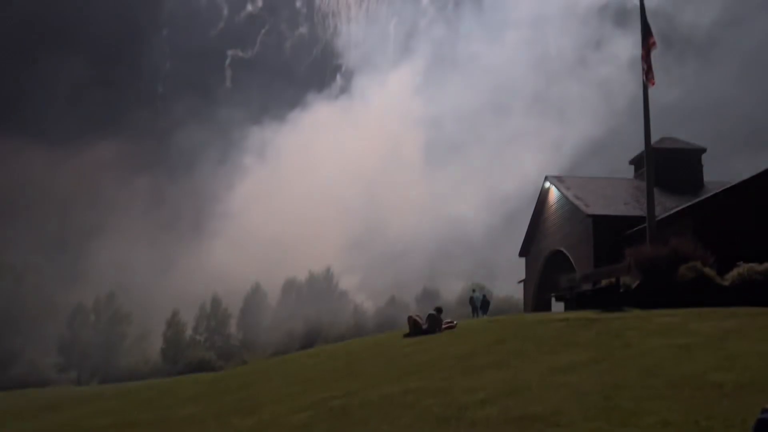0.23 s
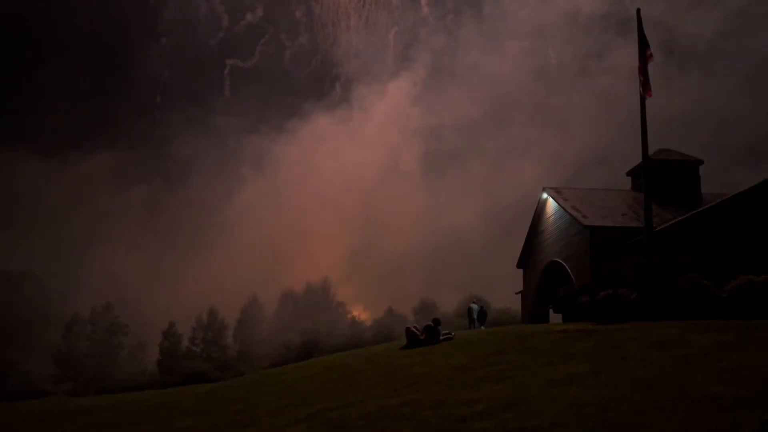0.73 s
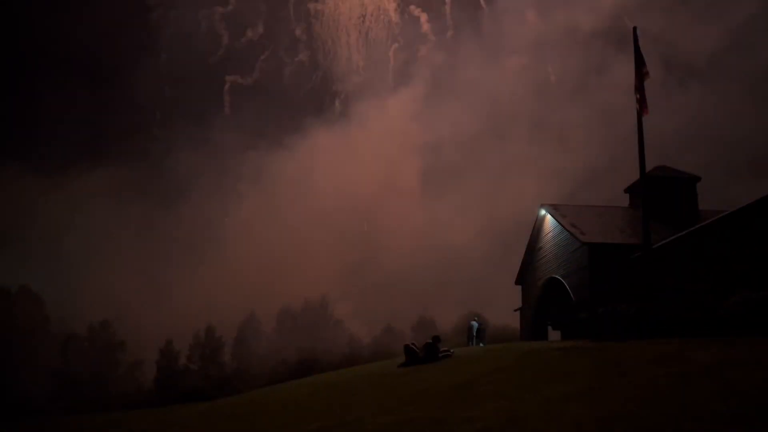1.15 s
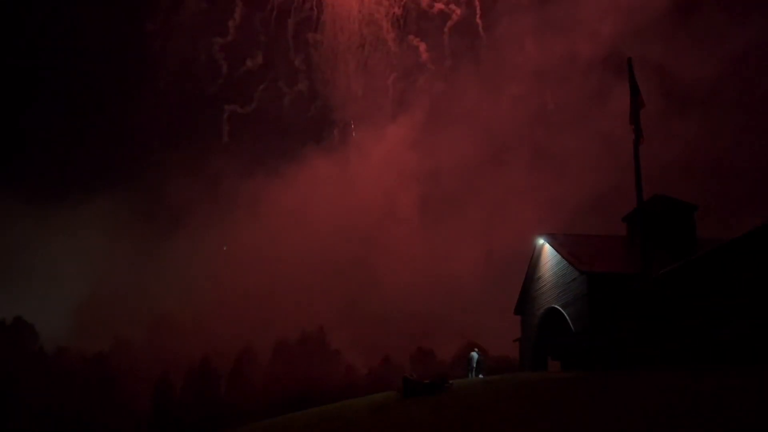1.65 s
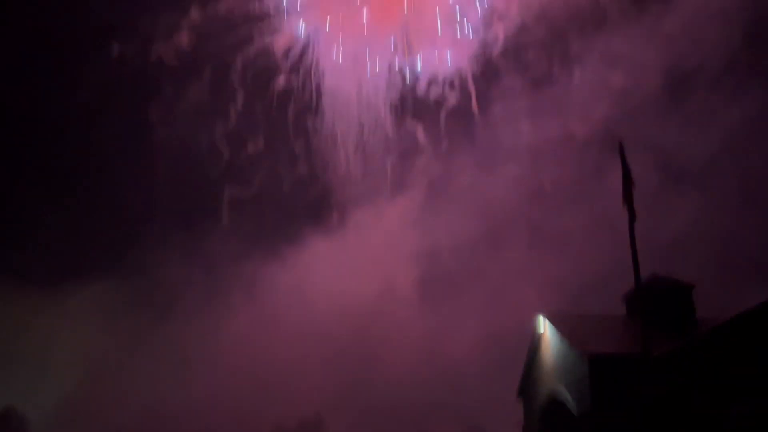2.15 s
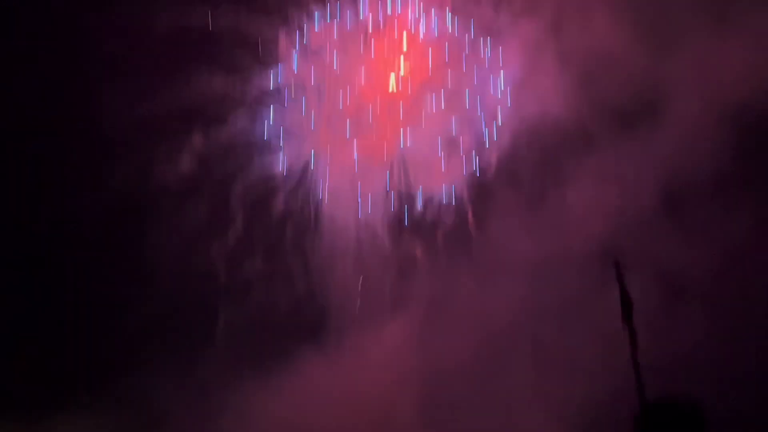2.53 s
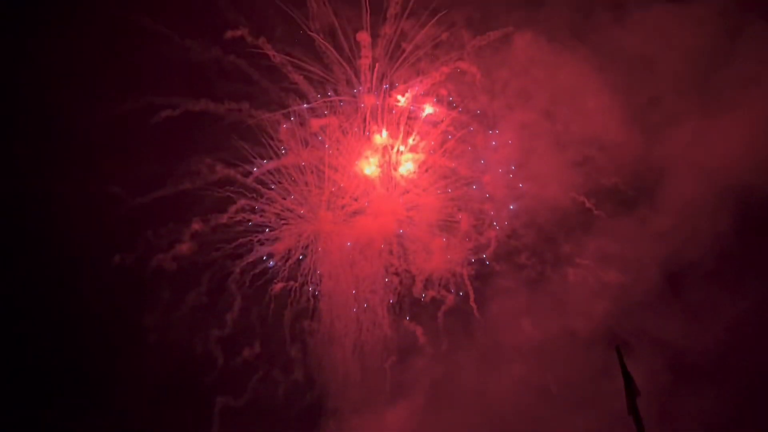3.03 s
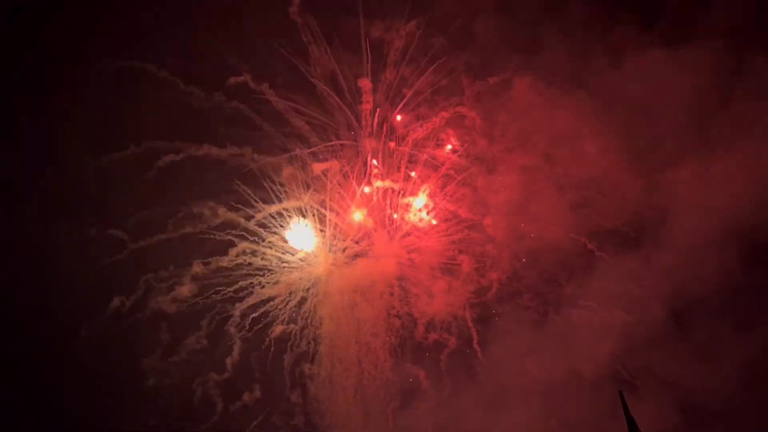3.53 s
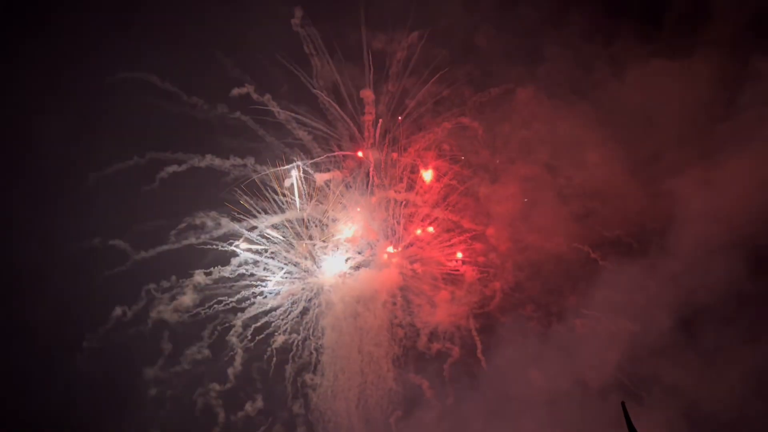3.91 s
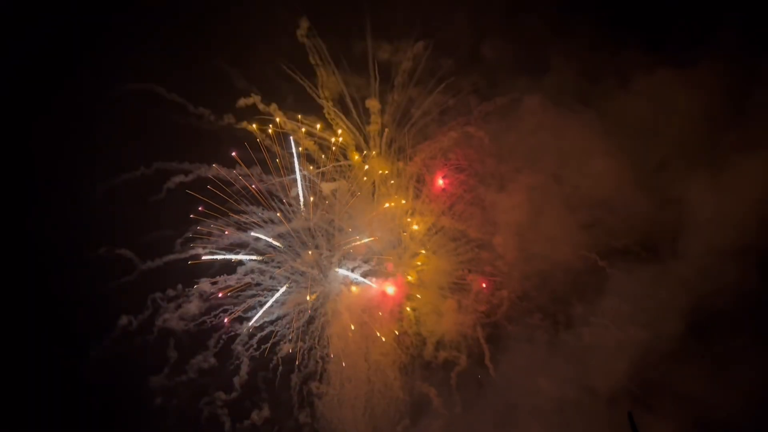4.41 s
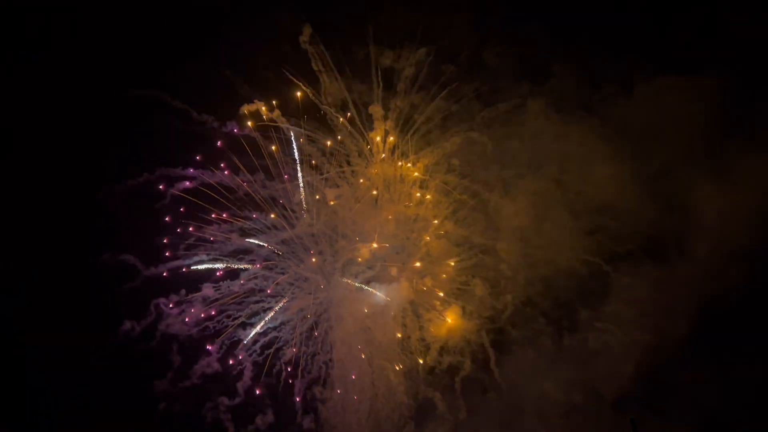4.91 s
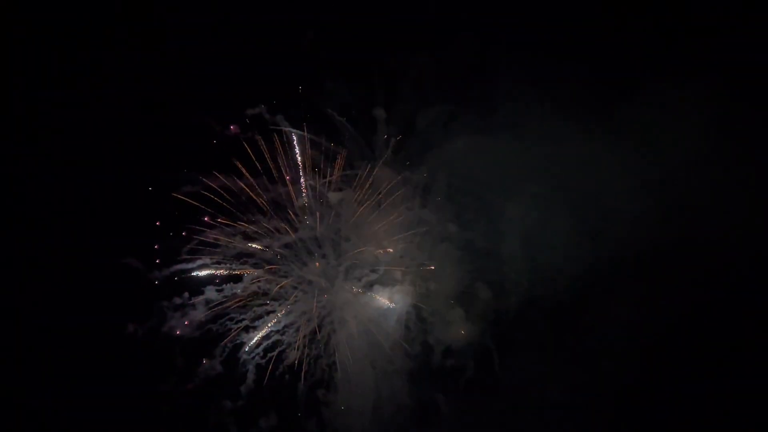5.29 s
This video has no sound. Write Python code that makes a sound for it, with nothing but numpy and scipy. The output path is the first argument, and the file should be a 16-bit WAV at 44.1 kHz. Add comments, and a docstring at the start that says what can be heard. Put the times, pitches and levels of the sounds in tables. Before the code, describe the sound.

Firework shells burst over a night hillside: a tight opening volley, then spaced cracks and deep booms, each trailing rumbling, hissing echoes.

```python
"""A hillside at night: firework shells burst high above it, received by a small two-port microphone.
Each bang or thud is a minimum-phase pulse, a crack over a boom, doubled by its reflection off the ground.
Woods and slopes return noise shaped in time and frequency: a rumble and a hiss that dulls with age.
Hillside and buildings clatter with runs of filtered clicks; swarms of stars crackle in the same way.
A faint background of hiss and rumble lies beneath."""
import sys
import numpy as np
from scipy import signal
from scipy.fft import rfft, irfft, next_fast_len
from scipy.io import wavfile
from scipy.ndimage import uniform_filter1d, map_coordinates

SR = 44100
rng = np.random.default_rng(int(sys.argv[2]) if len(sys.argv) > 2 else 0)


def dump(signal):
    """Clip the signal to [-1, 1] and save it as 16-bit WAV at the path in sys.argv[1]."""
    limited = np.clip(np.atleast_2d(signal).T, -1, 1)
    pcm = np.round(limited * 32767).astype(np.int16)
    wavfile.write(sys.argv[1], SR, pcm)


N = 244858

# Blasts, thuds and single echoes: start_s, ground_delay_s, scatter_db, hollow_hz (0 or less: none),
# boom_db, boom_low_hz, boom_high_hz, crack_db, crack_corner_hz, air_cutoff_hz
BANGS_AND_THUDS = [ (0.039, 0.00134, -7, 0, 24, 85, 140, -1, 900, 2500),
                   (0.07, 0.00133, -10, 0, 16, 80, 130, -3, 900, 2500),
                   (0.098, 0.0014, -12, 0, 25, 70, 125, -5, 800, 3000),
                   (0.163, 0.0016, 0, 0, 24.5, 85, 159, -4, 700, 3000),
                   (0.204, 0.0012, -7, 0, 14, 120, 250, 2, 900, 1800),
                   (1.224, 0.002, 4.5, 0, 10, 54, 140, -17, 303, 2000),
                   (1.279, 0.0015, 3, 2609, 33.5, 49.6, 120.5, 15.5, 236, 4030),
                   (1.517, 0.002, -2, 0, 16, 66, 163, -6, 302, 2010),
                   (1.6613, 0.00389, -4.5, 2, 34.5, 120, 343, 33.5, 356, 13070),
                   (2.777, 0.0013, -1.5, 0, 6, 100, 250, -14, 795, 3490),
                   (3.1407, 0.00304, 2, 0, 4.5, 189, 335, -27.5, 600, 2550),
                   (3.2456, 0.0041, 1, 2798, -2, 130, 374, 7, 800, 2020),
                   (3.3007, 0.00471, -1, 2830, -2, 190, 370, 15.5, 1390, 4230),
                   (3.461, 0.0027, 0, 0, 10.5, 160, 305, -18, 600, 2500),
                   (3.8145, 0.00453, -1.5, 3251, -2, 160, 458, 19.5, 975, 5880),
                   (4.16, 0.00435, -1.5, -3, 34, 53.6, 247, 31, 395, 12500),
                   (4.221, 0.0016, 3, -5, 22.5, 61, 195, -7, 400, 2000),
                   (4.426, 0.0016, 1.5, 0, 23, 101, 211, 1.5, 500, 2000),
                   (4.496, 0.0019, -7, 0, 22, 100, 203, -6, 500, 2000),
                   (4.85, 0.0017, -3.5, 0, 8, 90.4, 247, -7, 780, 2960),
                   (4.876, 0.0017, 9, 0, 18.5, 75, 148, -10, 500, 2010),
                   (5.0278, 0.0012, -3, 0, -2, 60, 150, 6.5, 3430, 3600),
                   (5.0312, 0.00124, -2, 0, 41.5, 51.3, 149, 16.5, 2360, 3450),
                   (5.422, 0.0011, 6, 0, 26.5, 49.7, 116, -5, 306, 2030)]
# Microphone colour for sound from overhead: frequency_hz, level_db
OVERHEAD_RESPONSE = [(100, 2), (300, 2.2), (480, 2.5), (700, 0), (1000, -1.5), (1250, -2.5), (1430, 2),
                     (1640, -5.5), (1850, -2.5), (2400, -3.5), (3300, -5.5), (4400, -2), (5600, -6.5),
                     (7200, -1), (13500, -1.5), (16000, -5)]
# All-pass turns of the microphone, by which the bass of a blast lags its treble: frequency_hz
ALL_PASS_HZ = [80, 200, 540, 1900]
# Swarms of crackling stars: loudest_s, length_s, level_db, snaps_per_s, low_hz, high_hz,
# ground_delay_s, left_lead_s
STAR_SWARMS = [ (0.034, 0.12, -35.5, 430, 780, 4200, .0015, -.00013),
               (0.174, 0.067, -37.5, 450, 990, 3800, .0015, -.00013),
               (4.566, 0.24, -43.5, 1100, 880, 3500, 0.000745, 0)]
# Clattering echoes from hillside (left) and buildings (right): start_s, attack_s, fade_db_per_s,
# level_db, low_hz, high_hz, left_lead_s
CLATTER_ECHOES = [ (0.238, .007, 500, -44, 400, 1100, -.0003),
                  (0.66, 0.038, 39.5, -51.5, 550, 2400, .00041),
                  (1.373, 0.0069, 350, -42, 380, 1410, -.00025),
                  (1.722, 0.018, 130, -40, 350, 2500, -.00025), (2.19, 0.068, 40, -49.5, 497, 2420, .00038),
                  (2.32, 0.015, 172, -42, 420, 1090, .0004), (2.765, 0.019, 17, -55, 590, 1460, .00042),
                  (4.248, .006, 500, -35, 300, 1000, -0.0095), (4.279, .006, 500, -39.5, 320, 1200, -.0003),
                  (4.65, 0.083, 50, -42.5, 780, 2890, .00041),
                  (5.124, 0.0092, 333, -28.5, 400, 1380, 0.0011)]
# Rolls of echo set off by the big blasts: start_s, attack_s, hold_s, fade_db_per_s, hiss_db, rumble_db,
# treble_loss_db (at 5 kHz), far_slope_db, hollow_hz (0 or less: none)
ECHO_ROLLS = [ (-0.02, 0.0066, 0.13, 66, -34, -27, 3, -19, 0),
              (0.209, 0.0075, 0.02, 30, -45.5, -43, -2, -15, 0),
              (1.316, 0.066, 0.2, 33, -43.5, -47, 3, -4, 0),
              (1.672, 0.052, 0.0067, 50, -43, -33.5, -2, -7, 0),
              (3.278, 0.031, 0.081, 36.5, -47, -57.5, 2.5, -12, 2829),
              (3.805, 0.074, 0.051, 31, -45, -62, 1.5, 7.5, 3243),
              (4.14, 0.11, 0.49, 19, -41, -30.5, -3, -4.5, 4),
              (5.074, 0.047, 0.15, 34, -33.5, -32, 2.5, -16, 0)]
# Colours of rumble and hiss: frequency_hz, level_db
RUMBLE_COLOUR = [(25, -3), (45, 18), (65, 19.5), (120, 22), (180, 18), (260, 10), (400, -3), (700, -13),
                 (2000, -58)]
HISS_COLOUR = [(60, -11.5), (200, 12), (400, 10.5), (700, 9.5), (1100, 8.5), (1400, 11), (1560, 9),
               (1750, 6), (2000, 4), (2250, 3), (2550, 5), (3200, 3), (4700, 1.16), (5600, -3), (7500, -6),
               (10000, -15), (13000, -17), (16000, -33.5)]
# Faint background hiss between the blasts: time_s, hiss_db
BACKGROUND_HISS = [(0, -55), (1.15, -57), (2.6, -52.5), (3.2, -52), (5.55, -47.5)]
# Correlation of diffuse sound between the ports: frequency_hz, likeness (-1 to 1)
PORT_LIKENESS = [(50, 1), (130, 0.95), (250, 0.89), (550, 0.3), (900, 0.19), (1400, -0.53), (2100, 0.64),
                 (4000, 0.33), (7000, 0.43), (10000, 1)]
# Phase by which the left port leads: frequency_hz, lead_rad
PORT_LEAD = [(60, 0), (250, .1), (600, .5), (1400, .1), (3500, .55), (5000, .25), (7000, -.4), (8500, -1.5),
             (10000, -3.1), (13000, -6.3), (16000, -8.5)]
# Brief dip of the level: from_s, to_s, level_db
LEVEL_DIP = (0.2128, 0.223, -14)

BLAST_SIZE, FRAME = 16384, 1024  # samples
BLAST_PAN_DB = 3.5  # all bangs and thuds lie a little to the left
WALL_DELAY_S = 0.068  # slap from a building close by
SWARM_WIDTH, CLATTER_WIDTH = 0.55, 0.52  # independent share of each click at the two ports
SNAP_SPREAD_DB, REFLECTIONS_PER_S = 4, 1500
BUILD_POWER = 2.4  # ever more trees reflect as the wave front spreads
DULLING_DB_PER_S = 13.5  # at 5 kHz: later echoes have crossed more air
# Each roll comes back from the far slope
SLOPE_DELAY_S, SLOPE_ATTACK_S, SLOPE_HOLD_S = 0.44, 0.15, 0.12
SLOPE_FADE_DB_PER_S, SLOPE_LOSS_DB, SLOPE_RUMBLE_DB = 19.5, 1, -0.5
BACKGROUND_RUMBLE_DB, BACKGROUND_LOSS_DB = -45.5, 16  # the loss is at 5 kHz
CUTOFF_HZ = 16300


def blasts(shade_low_hz=520, shade_top_hz=6000):
    """Superposition: every bang or thud reaches both ports, only mid frequencies being shaded to one side."""
    out, hz = np.zeros((2, N + BLAST_SIZE)), bins(BLAST_SIZE)
    shade = 1 / (1 + (shade_low_hz / hz) ** 2) / (1 + (hz / shade_top_hz) ** 2)
    sides = from_db(np.array([[0.5], [-0.5]]) * BLAST_PAN_DB * shade)
    fade = np.minimum(1, np.linspace(2, 0, BLAST_SIZE)) ** 2
    for start_s, bounce_s, scatter_db, hollow_hz, *colour in BANGS_AND_THUDS:
        source = blast_wave(*colour) * hollow(hz, hollow_hz)
        arriving = source * surroundings(bounce_s, scatter_db) * sides
        start = round(start_s * SR)
        out[:, start:start + BLAST_SIZE] += irfft(arriving) * fade
    return out[:, :N]


def blast_wave(boom_db, low_hz, high_hz, crack_db, corner_hz, air_hz, crack_low_share=1.0, port_low_hz=45):
    """Explosive radiation: a swelling gas ball booms, its shock front cracks, the air takes off the top."""
    hz = bins(BLAST_SIZE)
    boom = from_db(boom_db) / np.hypot(1, (low_hz / hz) ** 2) / np.hypot(1, (hz / high_hz) ** 4)
    crack = from_db(crack_db) / np.hypot(1, hz / corner_hz) / np.hypot(1, crack_low_share * low_hz / hz)
    air = 1 / np.hypot(1, (hz / air_hz) ** 2)
    microphone = from_db(at_hz(OVERHEAD_RESPONSE, hz)) / np.hypot(1, (port_low_hz / hz) ** 3)
    wave = causal(np.hypot(boom, crack) * air * microphone)
    return -wave * smear(hz)


def causal(gain):
    """Minimum phase: folding the cepstrum gives a gain curve a pulse with a sudden front."""
    cepstrum = irfft(np.log(gain + 1e-7))
    half = len(cepstrum) // 2
    folded = np.r_[cepstrum[0], 2 * cepstrum[1:half], np.zeros(half)]
    return np.exp(rfft(folded))


def smear(hz, damping=0.68):
    """Phase dispersion: a chain of all-passes turns a pulse into a quick downward sweep."""
    turns = [1 - (hz / turn) ** 2 + 1j * damping * hz / turn for turn in ALL_PASS_HZ]
    return np.prod([np.conj(turn) / turn for turn in turns], axis=0)


def hollow(hz, dip_hz, depth_db=6.5, second_dip=1.79, width=0.057):
    """Spectral notching: some shells crack with two dips in the treble, which their echoes keep."""
    if dip_hz <= 0:
        return np.ones_like(hz)
    centres = (dip_hz, second_dip * dip_hz)
    dips = sum(np.exp(-(np.log(hz / centre) / width) ** 2 / 2) for centre in centres)
    return from_db(-depth_db * dips)


def surroundings(bounce_s, scatter_db, bounce=0.48, grass_hz=4200, grazing_db=5, steep_s=0.0014):
    """Multipath: direct sound, one bounce off the grass, scatter nearby and a dull slap from a wall."""
    hz = bins(BLAST_SIZE)
    ground = bounce * np.exp(-2j * np.pi * hz * bounce_s) / (1 + 1j * hz / grass_hz)
    close = scatter(level_db=4.5, t60=0.041, low_hz=1233, top_hz=3450)
    lowness = 1 - bounce_s / steep_s  # a low source bounces sooner and grazes more of the hillside
    further = scatter(level_db=-1.0, t60=0.15, low_hz=254, top_hz=2196) * from_db(grazing_db * lowness)
    slap = scatter(level_db=-12.0, t60=0.32, low_hz=90, top_hz=160)
    wall = slap * np.exp(-2j * np.pi * hz * WALL_DELAY_S)
    return 1 + ground + from_db(scatter_db) * (close + further + wall)


def scatter(level_db, t60, low_hz, top_hz):
    """Diffuse reflection: a spray of small reflections decays exponentially, by 60 dB in t60 seconds."""
    hz, t = bins(BLAST_SIZE), np.arange(BLAST_SIZE) / SR
    spray = rng.standard_normal((2, BLAST_SIZE)) * from_db(-60 * t / t60)
    mid, side = rfft(spray / np.sqrt(np.sum(spray ** 2) / 2))
    band = 1 / (1 + low_hz / (1j * hz)) / (1 + 1j * hz / top_hz)
    return from_db(level_db) * two_ports(mid, side, hz) * band


def crackle(bounce=0.87):
    """Random impulse trains: swarms of snapping stars swell and fade, doubled by ground reflection."""
    out, t = 0, np.arange(N) / SR
    for loudest_s, length_s, db, snaps_per_s, low_hz, high_hz, bounce_s, lead_s in STAR_SWARMS:
        direct = snaps(snaps_per_s, SWARM_WIDTH, low_hz, high_hz, lead_s)
        reflected = np.array([delayed(port, bounce_s) for port in direct])
        swarm = direct + bounce * reflected
        swell = np.exp(-2 * ((t - loudest_s) / length_s) ** 2)
        out = out + swarm / swarm.std() * from_db(db) * swell
    return out


def clatter(rough_db=2.5, air_hz=5500):
    """Discrete echoes: a hillside or building returns a blast as a rough run of reflections from one side."""
    out, t = 0, np.arange(N) / SR
    for start_s, attack_s, fade, db, low_hz, high_hz, lead_s in CLATTER_ECHOES:
        level = from_db(db) * np.sqrt(envelope(t - start_s, attack_s, 0, fade))
        out = out + level * snaps(REFLECTIONS_PER_S, CLATTER_WIDTH, low_hz, high_hz, lead_s, order=2)
    out = signal.sosfilt(signal.butter(3, air_hz, fs=SR, output="sos"), out + 1e-18)
    return out * from_db(rough_db * flutter(per_s=40))


def snaps(per_s, width, low_hz, high_hz, lead_s, order=3):
    """Time difference of arrival: uneven band-passed clicks reach one port first; rms 1 at the left port."""
    born = rng.random(N) < per_s / SR
    sizes = from_db(SNAP_SPREAD_DB * np.minimum(rng.standard_normal(N), 2))
    shared = rng.choice([-1, 1], N)
    clicks = born * sizes * (shared + width * rng.standard_normal((2, N)))
    band = signal.butter(order, [low_hz, high_hz], "band", fs=SR, output="sos")
    left, right = signal.sosfilt(band, clicks + 1e-18)
    return np.array([left, delayed(right, lead_s)]) / left.std()


def echoes(grain_db=0.5, patchy_db=2.0, swell_db=1.88, lumpy_db=3.0, low_hz=44):
    """Reverberation: countless small reflections merge into lumpy rumble and grainy hiss, over a background."""
    noise = rng.standard_normal((2, N))
    hz, t, (mid, side) = signal.stft(noise, SR, nperseg=FRAME, noverlap=FRAME * 3 // 4)
    hz = np.maximum(hz, 1)
    hiss, rumble = rolls(hz, t)
    uneven_db = patchy_db * patches(hz, t, width_hz=110, lasts_s=0.13, glide_hz_per_s=700)
    uneven_db += swell_db * patches(hz, t, width_hz=662, lasts_s=0.05)
    lumps_db = lumpy_db * patches(hz, t, width_hz=420, lasts_s=0.06)
    hiss = hiss * from_db(at_hz(HISS_COLOUR, hz)[:, None] + uneven_db)
    rumble = rumble * from_db(at_hz(RUMBLE_COLOUR, hz)[:, None] + lumps_db)
    shaped = two_ports(mid, side, hz[:, None]) * np.hypot(hiss, rumble)
    _, sound = signal.istft(shaped, SR, nperseg=FRAME, noverlap=FRAME * 3 // 4)
    sound = sound[:, :N] * from_db(grain_db * flutter(per_s=380))
    return signal.sosfilt(signal.butter(4, low_hz, "high", fs=SR, output="sos"), sound)


def rolls(hz, t, air_power=0.9):
    """Air absorption: each roll returns from the woods, then from the far slope, and dulls as it ages."""
    # Relative absorption: 0 at 1 kHz, 1 at 5 kHz
    absorption = ((hz[:, None] / 1000) ** air_power - 1) / (5 ** air_power - 1)
    background_db = np.interp(t, *np.transpose(BACKGROUND_HISS))
    # Hiss and rumble are summed as powers, starting from the background
    hiss = from_db(background_db - absorption * BACKGROUND_LOSS_DB) ** 2
    rumble = from_db(BACKGROUND_RUMBLE_DB) ** 2
    for start_s, attack_s, hold_s, fade, hiss_db, rumble_db, loss_db, slope_db, hollow_hz in ECHO_ROLLS:
        age, slope_age = t - start_s, t - start_s - SLOPE_DELAY_S
        woods = envelope(age, attack_s, hold_s, fade)
        slope = envelope(slope_age, SLOPE_ATTACK_S, SLOPE_HOLD_S, SLOPE_FADE_DB_PER_S)
        slope = slope * from_db(slope_db) ** 2
        colour = hollow(hz[:, None], hollow_hz)
        for power, since, first_loss_db in (woods, age, loss_db), (slope, slope_age, SLOPE_LOSS_DB):
            dull_db = first_loss_db + DULLING_DB_PER_S * np.maximum(since, 0)
            hiss = hiss + power * (from_db(hiss_db - absorption * dull_db) * colour) ** 2
        rumble = rumble + (woods + slope * from_db(SLOPE_RUMBLE_DB) ** 2) * from_db(rumble_db) ** 2
    return np.sqrt(hiss), np.sqrt(rumble)


def patches(hz, t, width_hz, lasts_s, glide_hz_per_s=0, size=256):
    """Interference: unequal paths add and cancel in a smooth random pattern, which may glide upward."""
    hz, t = np.meshgrid(hz, t, indexing="ij")
    where = [(hz - glide_hz_per_s * t) / width_hz, t / lasts_s]
    return map_coordinates(rng.standard_normal((size, size)), where, order=1, mode="wrap")


def envelope(age, attack_s, hold_s, fade_db_per_s):
    """Energy decay: power builds up, holds and dies away exponentially."""
    build = np.clip(age / attack_s, 0, 1) ** BUILD_POWER
    return build * from_db(-fade_db_per_s * np.maximum(age - attack_s - hold_s, 0)) ** 2


def two_ports(mid, side, hz):
    """Spatial coherence: diffuse sound is alike at both ports in the bass and differs higher up."""
    alike = np.clip(at_hz(PORT_LIKENESS, hz), -1, 1)
    mid, side = np.sqrt((1 + alike) / 2) * mid, np.sqrt((1 - alike) / 2) * side
    return np.array([mid + side, mid - side])


def flutter(per_s):
    """Random modulation: a wandering of spread 1 that takes a new value per_s times a second."""
    walk = np.interp(np.arange(N) * min(per_s / SR, 1), np.arange(N), rng.standard_normal(N))
    return walk / walk.std()


def delayed(x, by_s):
    """Propagation delay: the same sound by_s seconds later."""
    return np.interp(np.arange(N) - by_s * SR, np.arange(N), x)


def from_db(db):
    """Logarithmic level: decibels to amplitude gain."""
    return 10 ** (np.asarray(db) / 20)


def at_hz(points, hz):
    """Logarithmic pitch: read a table along a log-frequency axis."""
    points = np.array(points)
    return np.interp(np.log(hz), np.log(points[:, 0]), points[:, 1])


def bins(size):
    """Fourier analysis: frequencies of a real transform, kept above zero."""
    return np.maximum(np.arange(size // 2 + 1) * SR / size, 1)


def scene():
    """Superposition of all sources, then the phase difference between the two ports."""
    size = next_fast_len(N + BLAST_SIZE)
    left, right = blasts() + crackle() + clatter() + echoes()
    lag = np.exp(-1j * at_hz(PORT_LEAD, bins(size)))
    right = irfft(rfft(right, size) * lag, size)[:N]
    return np.array([left, right])


def record(dry, ceiling=1.35):
    """Saturation and band-limiting: the level dips once, the loudest peaks are rounded, the top is cut."""
    t = np.arange(N) / SR
    from_s, to_s, dip_db = LEVEL_DIP
    dip = uniform_filter1d(1.0 * ((t > from_s) & (t < to_s)), size=64)
    rounded = ceiling * np.tanh(dry * from_db(dip_db * dip) / ceiling)
    return signal.sosfilt(signal.ellip(10, 0.1, 80, CUTOFF_HZ, fs=SR, output="sos"), rounded)


dry = scene()
out = record(dry)
dump(out)
```